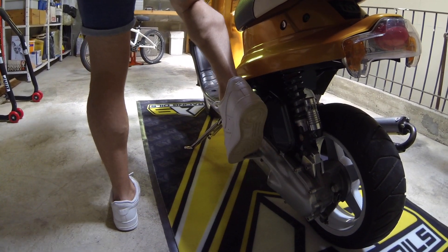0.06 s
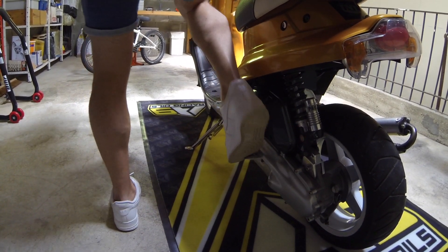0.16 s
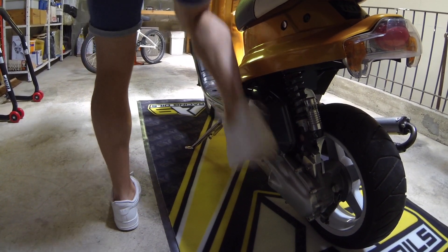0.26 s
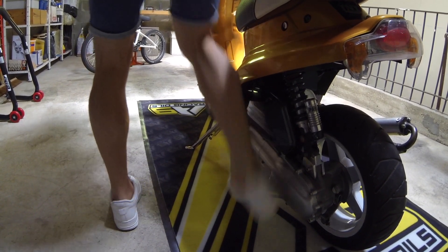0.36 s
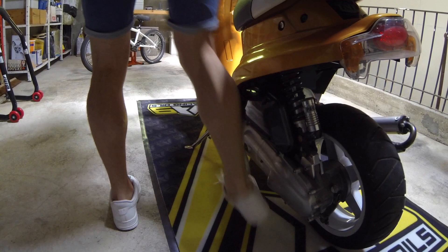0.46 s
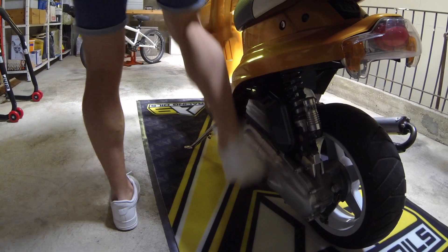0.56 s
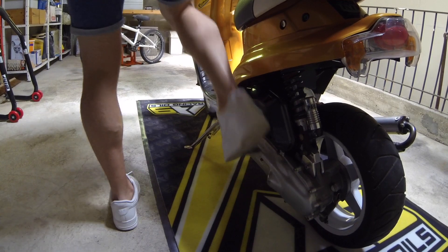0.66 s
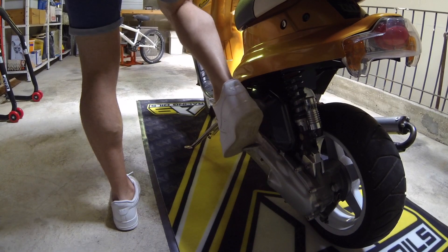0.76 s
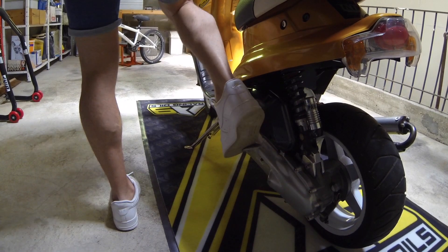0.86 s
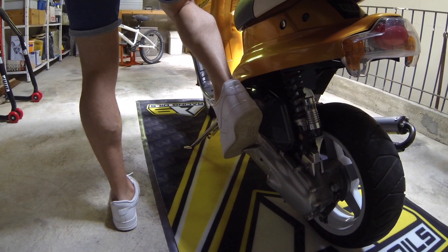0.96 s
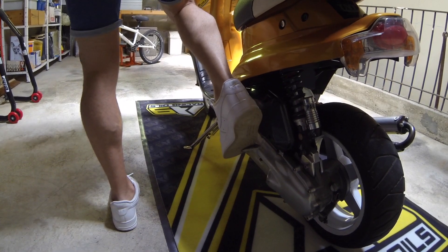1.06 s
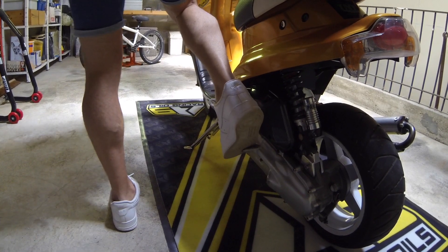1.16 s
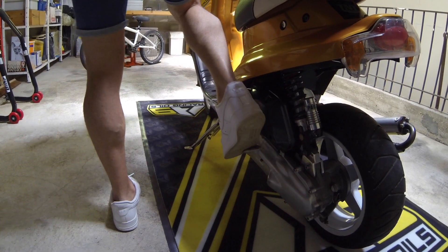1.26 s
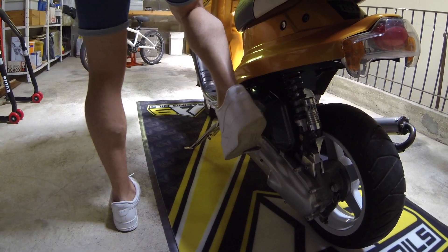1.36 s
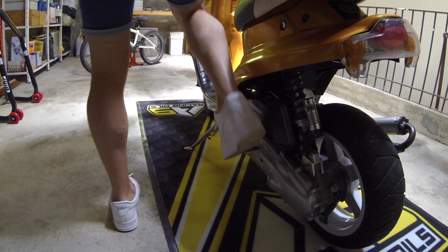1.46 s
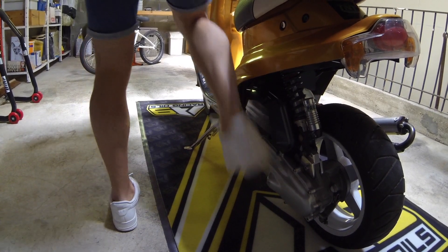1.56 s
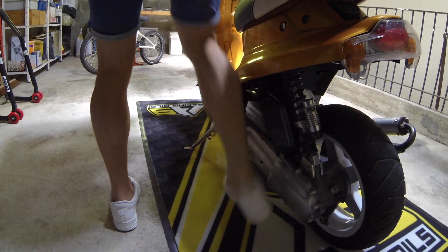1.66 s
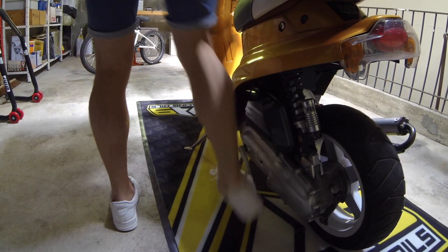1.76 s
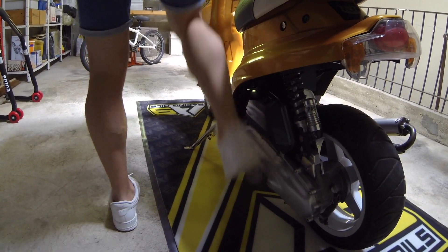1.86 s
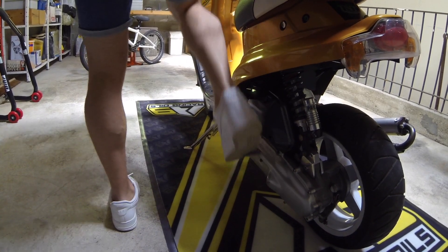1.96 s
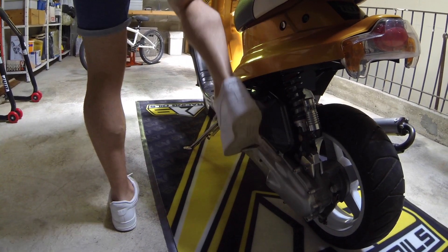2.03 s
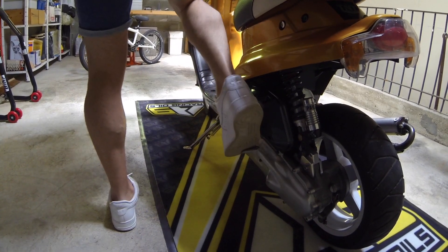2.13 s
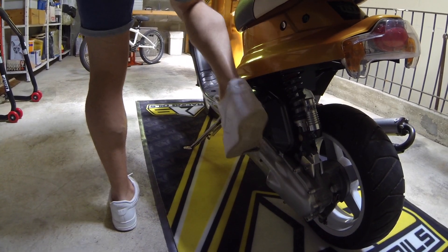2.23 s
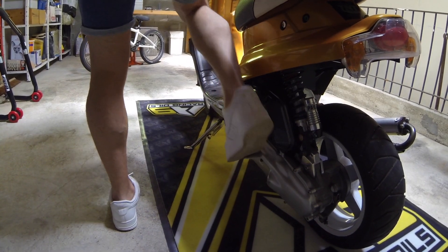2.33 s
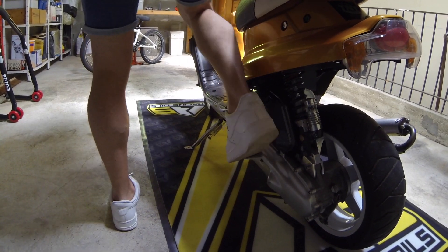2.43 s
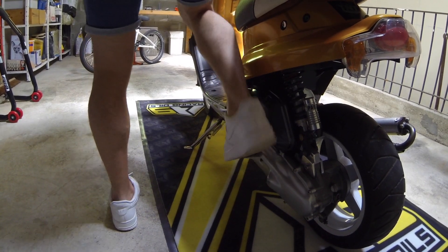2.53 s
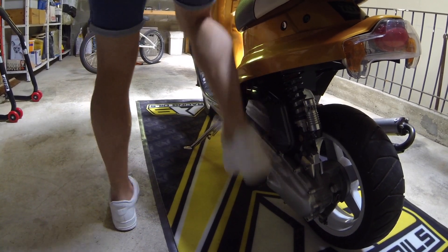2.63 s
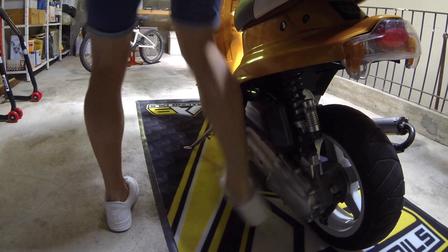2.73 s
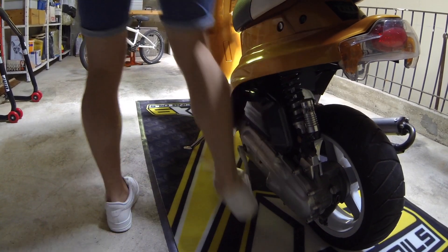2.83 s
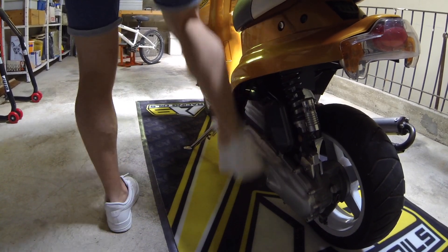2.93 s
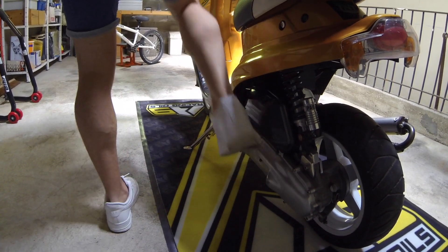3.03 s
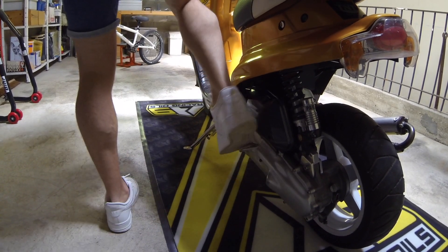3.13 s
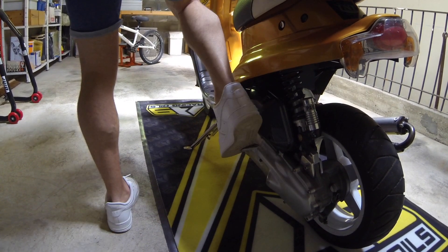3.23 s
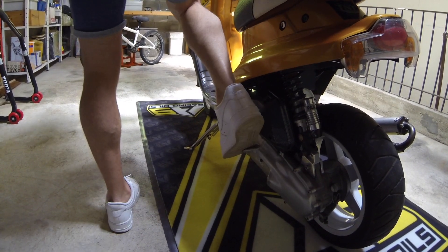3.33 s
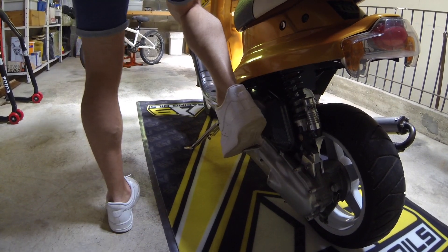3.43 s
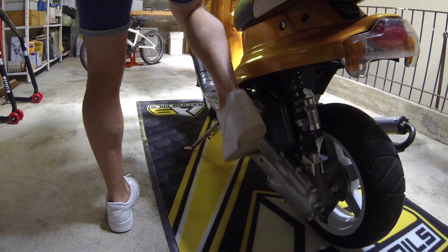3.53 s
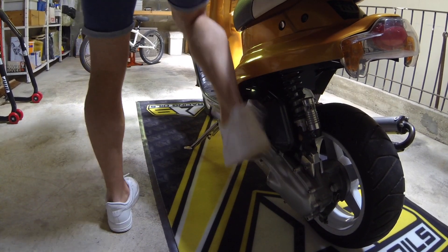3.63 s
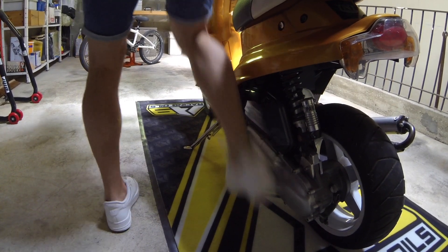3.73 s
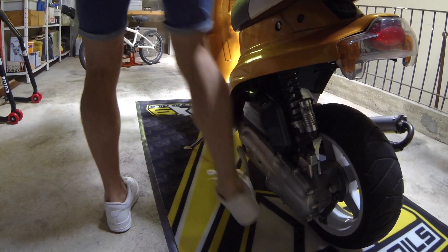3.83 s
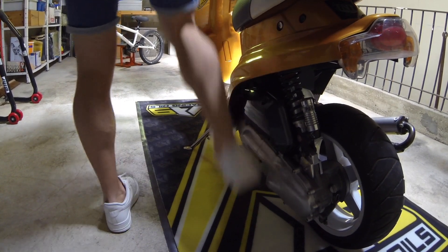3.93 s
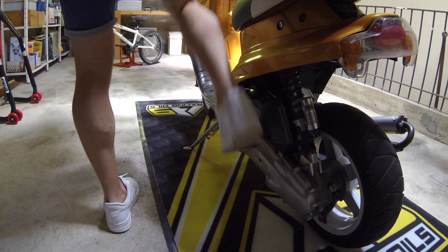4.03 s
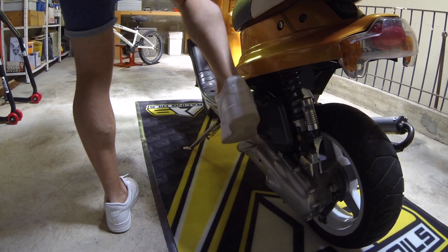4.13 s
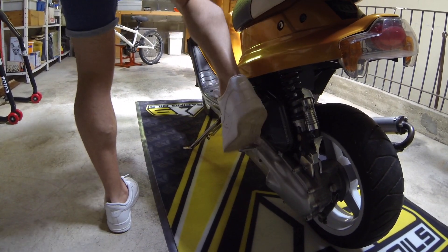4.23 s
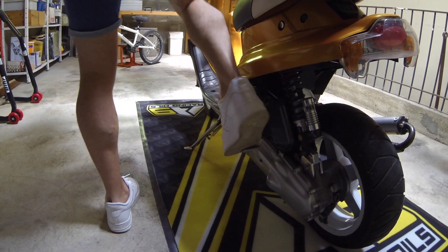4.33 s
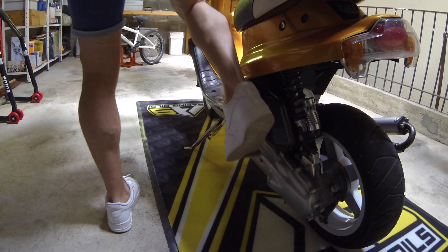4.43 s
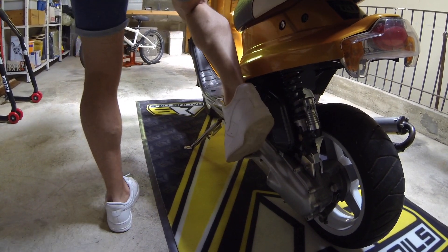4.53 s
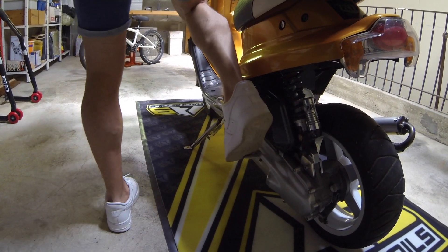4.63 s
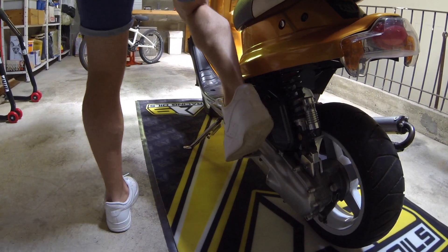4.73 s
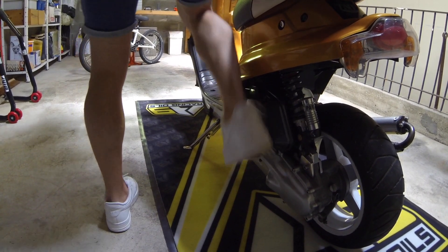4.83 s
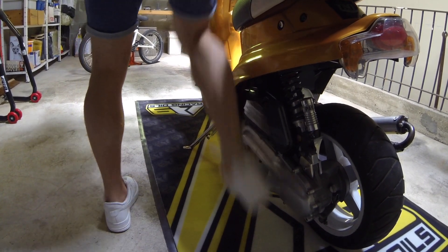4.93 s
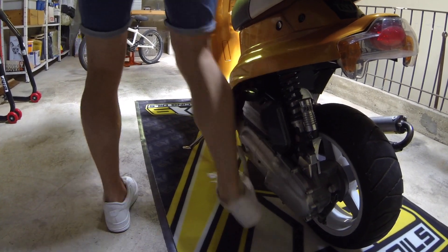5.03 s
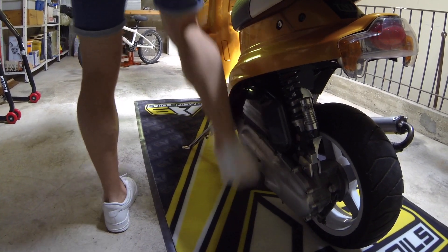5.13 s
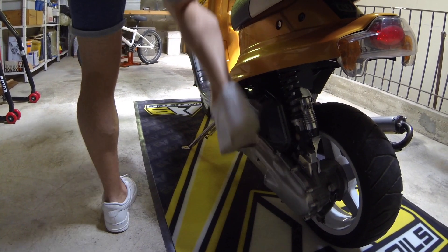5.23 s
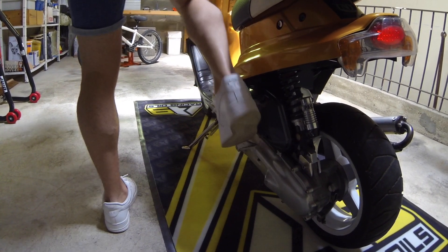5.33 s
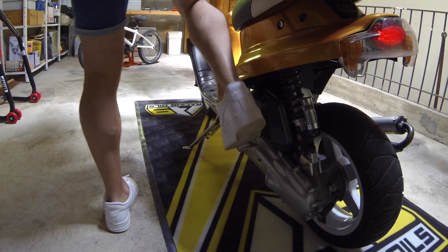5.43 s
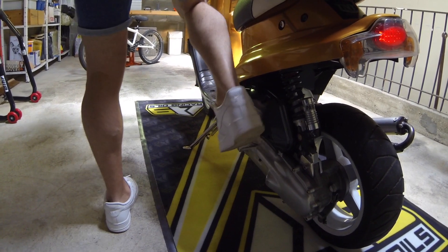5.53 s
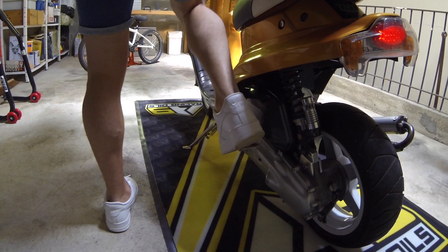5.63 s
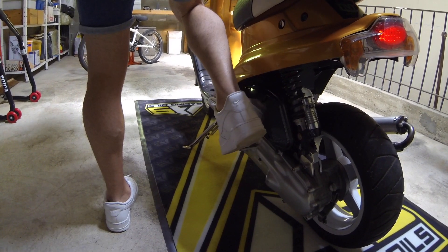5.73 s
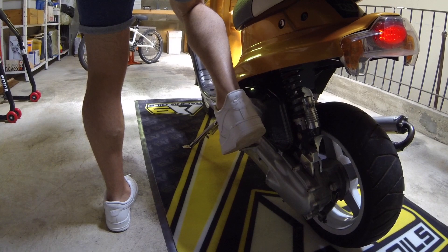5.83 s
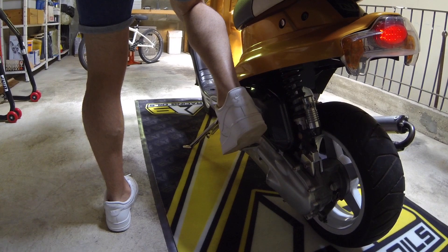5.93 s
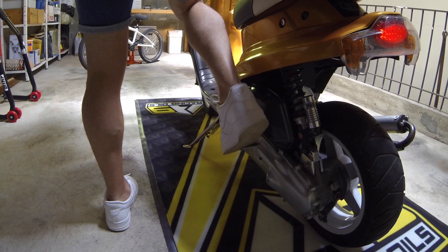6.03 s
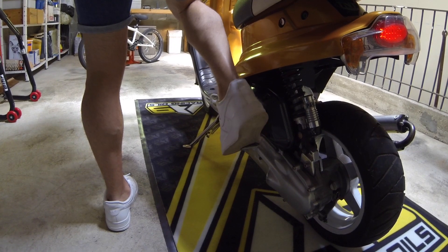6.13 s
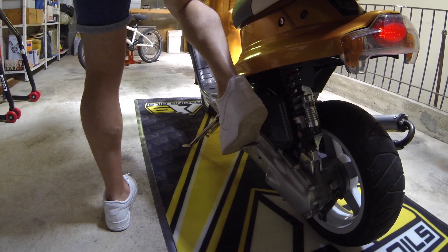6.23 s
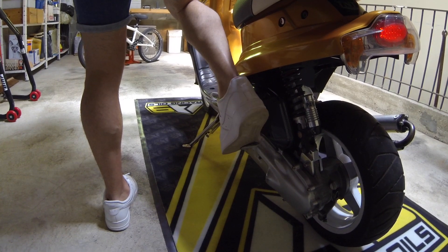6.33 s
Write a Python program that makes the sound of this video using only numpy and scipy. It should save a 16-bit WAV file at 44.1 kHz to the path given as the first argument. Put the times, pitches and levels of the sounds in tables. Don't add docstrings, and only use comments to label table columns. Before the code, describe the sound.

Close by, a scooter's kick lever bites its ratchet, whirs through gears and slams onto a metal stop, five times about a second apart. Between kicks come air puffs, compression chuffs, small knocks and spring-back clunks. After the last, the two-stroke engine catches in a rough rattling burst, then weakens and dies. Short concrete garage reverberation over a faint low hum.

```python
import sys
import numpy as np
from scipy import signal
from scipy.fft import rfft, irfft
from scipy.io import wavfile

SR = 44100
rng = np.random.default_rng(int(sys.argv[2]) if len(sys.argv) > 2 else 0)


def to_wav(sig):
    pcm = np.clip(np.atleast_2d(sig), -1, 1) * 32767
    pcm = np.round(pcm).astype(np.int16)
    wavfile.write(sys.argv[1], SR, pcm.T)


def convert_level_to_amplitude(level_db):
    exponent = np.asarray(level_db, float) / 20
    return 10 ** exponent


N = 281799


def rms_one(x):
    return x / np.sqrt(np.mean(x ** 2) + 1e-20)


def noise():
    return rng.standard_normal(N)


def at_hz(points, hz):
    table_hz, values = np.transpose(points)
    return np.interp(np.log(hz), np.log(table_hz), values)


def coloured(x, spectrum):
    hz = np.arange(N // 2 + 1) * SR / N + 1
    return rms_one(irfft(rfft(x) * convert_level_to_amplitude(at_hz(spectrum, hz)), N))


def steep(x, hz, kind):
    return signal.sosfilt(signal.butter(4, hz, kind, fs=SR, output="sos"), x)


def dip(x, hz, width_hz, depth):
    b, a = signal.iirpeak(hz, hz / width_hz, fs=SR)
    return x - np.clip(depth, 0, 1) * signal.lfilter(b, a, x)


def drift(rate_hz):
    r = np.exp(-2 * np.pi * rate_hz / SR)
    return rms_one(signal.lfilter([1], [1, -2 * r, r * r], noise()))


def grains(per_s, spread_db):
    sizes = convert_level_to_amplitude(spread_db * np.minimum(rng.exponential(1, N), 5))
    signs = rng.choice([-1, 1], N)
    return sizes * signs * (rng.random(N) < per_s / SR)


def fading(x, t60_s):
    return signal.lfilter([1], [1, -convert_level_to_amplitude(-60 / (t60_s * SR))], x)


def impulses(times_s, dbs):
    out = np.zeros(N)
    out[(times_s * SR).astype(int)] = convert_level_to_amplitude(dbs)
    return out


def hump(width_s):
    return np.hanning(round(width_s * SR))


def ring(x, modes):
    out = 0
    for hz, db, t60_s in modes:
        r = convert_level_to_amplitude(-60 / (t60_s * SR))
        w = 2 * np.pi * hz / SR
        out = out + signal.lfilter([0, convert_level_to_amplitude(db) * np.sin(w)], [1, -2 * r * np.cos(w), r * r], x + 1e-18)
    return out


def cycles_to_t60(modes):
    return [(hz, db, cycles / hz) for hz, db, cycles in modes]


def strike(times_s, dbs, modes, rise_s, last_s):
    blow = impulses(times_s, dbs) + 1e-18
    push = blow
    for s in (rise_s, last_s):
        push = signal.lfilter([1], [1, -np.exp(-1 / (s * SR))], push)
    contacts = push / (rise_s * SR) * rms_one(grains(20000, 2.5))
    both = np.array([contacts, blow * np.sqrt(last_s * SR / 2)])
    return ring(both, cycles_to_t60(modes))


# (freq_hz, density_db)
FLOOR = [(12, -26), (20, 1.5), (44, 2), (98, -14), (133, -16), (191, -20.5), (581, -27), (811, -28),
         (985, -29.5), (1720, -32), (2210, -35.5), (13100, -53.5), (15500, -60.5)]


def room_hum():
    return convert_level_to_amplitude(-51) * coloured(noise(), FLOOR) * convert_level_to_amplitude(0.5 * drift(16))


# (freq_hz, t60_s)
GARAGE_T60 = [(100, 0.4), (400, 0.51), (1500, 0.37), (4000, 0.33), (12000, 0.32)]


def garage(x, level_db=-6.5, first_wall_s=0.0044):
    t = np.arange(SR) / SR
    tail = 0
    for hz in 45 * 2. ** np.arange(9):
        sos = signal.butter(2, [hz / 2 ** .5, hz * 2 ** .5], "band", fs=SR, output="sos")
        tail = tail + signal.sosfilt(sos, rng.standard_normal(SR)) * convert_level_to_amplitude(-60 * t / at_hz(GARAGE_T60, hz))
    tail *= np.clip(t / first_wall_s - .5, 0, 1)
    return convert_level_to_amplitude(level_db) * signal.fftconvolve(x, tail / np.sqrt(np.sum(tail ** 2)))[:N]


def phase(kind, start_s, end_s, dbs):
    rise, fall, *layers_db = kind
    t = np.arange(0, N, 32) / SR
    level = 0
    for a, b, db in np.broadcast(start_s, end_s, dbs):
        early, late = np.maximum(a - t, 0), np.maximum(t - b, 0)
        level = level + convert_level_to_amplitude(db - rise * early - fall * late)
    return np.outer(convert_level_to_amplitude(np.array(layers_db)), np.interp(np.arange(N) / SR, t, level))


# (stop_s, peak_db, stroke_s), stroke ends at the stop
KICKS = [
    (0.327, -3.5, 0.079),
    (1.623, -5.5, .072),
    (2.678, -3.5, .0755),
    (3.716, -4.5, 0.078),
    (4.922, -4.5, 0.073),
]
# (rise_db_per_s, fall_db_per_s, air_db, casing_db, mesh_db, cover_db)
LEAN = (160.5, 1998.5, -53.5, -41.5, -53, -73)
DRIVE = (903, 1497, -33, -22.5, -39.5, -73.5)
WHIP = (500.5, 1499, -20, -32.5, -25, -70)
COAST = (3005, 106.5, -27, -24.5, -30.5, -46)
WHEEZE = (2998, 47, -39.5, -71, -68, -81)
SQUEEZE = (251, 282, -37, -39.5, -32.5, -45)
RETURN = (1500, 147.5, -92, -37.5, -36, -56)
SHUFFLE = (200, 189, -50, -54.5, -73, -84)
SING = (298, 300, -68.5, -67.5, -70.5, -34)
# (peak_s, level_db)
SQUEEZES = [
    (0.486, -1.5),
    (1.808, -1.5),
    (2.851, 1),
    (2.952, -9),
    (3.832, 1),
    (3.979, -4.5),
    (5.088, 1.5),
]
RETURNS = [
    (1.891, 6),
    (3.047, -4.5),
    (4.097, 1.5),
]
SHUFFLES = [
    (.942, 3.5),
    (4.3, 3),
    (4.47, -16),
    (4.546, -1),
]
SINGS = [
    (.49, -1.5),
    (1.79, -4),
    (3.865, -5.5),
    (3.965, 0.5),
    (5.18, -2),
]


def motion():
    stop, _, stroke = np.transpose(KICKS)
    bite = stop - stroke + 0.0071
    coast = stop + .02
    out = phase(LEAN, bite - .02, bite - .02, 0)
    out += phase(DRIVE, bite, stop - .015, 0)
    out += phase(WHIP, stop - .005, stop - .005, 0)
    out += phase(COAST, coast, coast, 0)
    out += phase(WHEEZE, stop, stop, 0)
    for kind, rows in ((SQUEEZE, SQUEEZES), (RETURN, RETURNS), (SHUFFLE, SHUFFLES), (SING, SINGS)):
        s, db = np.transpose(rows)
        out += phase(kind, s, s, db)
    return out


# (freq_hz, level_db, t60_s)
CASING = [(230, -27, 0.01), (318, -13.5, 0.17), (465.7, 0, 0.09), (549, -6.5, 0.073), (680, 1.5, 0.031),
          (703, 5.5, 0.027), (1020, -5, 0.039), (1181, -16.5, 0.044)]
# (freq_hz, density_db)
MESH = [(710, -3), (1200, -5), (1290, -22.5), (1420, -11.5), (1800, -1.5), (2050, -5), (3810, -15.5),
        (7570, -34.5), (11900, -38.5), (15500, -55)]
# (freq_hz, density_db)
AIR = [(12, -47), (20, 5), (49, -3.5), (108, 1.5), (136, 7), (183, -36), (239, -1.5), (350, -31.5),
       (460, -52.5), (770, -120)]
# (start_s, peak_db, pitch_hz)
CHUFFS = [(0.47, -22, 92.5), (0.627, -23, 50.5), (0.909, -43, 51.1), (1.788, -41, 98), (2.279, -37, 51.6),
          (2.929, -21, 50.7), (3.471, -36, 115), (3.984, -22.5, 66), (4.166, -30.5, 91.5), (4.451, -34, 79),
          (5.079, -41, 140), (0.654, -27, 140), (3.89, -32, 121), (4.039, -39, 126), (4.251, -37.5, 109)]


def crank():
    air, casing, mesh, cover = motion()
    teeth = rms_one(steep(ring(grains(700, 2.74), CASING), 1700, "low"))
    rasp = coloured(grains(4000, 2.2), MESH) * convert_level_to_amplitude(np.clip(0.28 * drift(29), -6, 6))
    sings = rms_one(steep(ring(grains(1200, 8.0), [(1275, -1.5, 0.19)]), [1000, 1600], "band"))
    puffs = coloured(noise(), AIR) * convert_level_to_amplitude(3.2 * drift(6.5))
    out = convert_level_to_amplitude(-5.0) * (air * puffs + casing * teeth + mesh * rasp + cover * sings)
    t = np.arange(round(.12 * SR)) / SR
    for s, db, hz in CHUFFS:
        swell = convert_level_to_amplitude(db - 1) * t * hz * np.exp(-1.3 * t * hz)
        start = round(s * SR)
        out[start:start + len(t)] += swell * np.sin(2 * np.pi * hz * t)
    return out


# (start_s, peak_db)
HOLLOW_KNOCKS = [
    (1.8686, -23),
    (2.4617, -44.5),
    (3.0415, -26),
    (3.2305, -57),
    (4.0914, -25.5),
    (5.1322, -26.5),
]
DRY_KNOCKS = [(.5244, -29.5), (.6523, -37.5), (.8016, -40), (1.2237, -34.5), (2.0268, -37.5),
              (2.2343, -31.5), (2.9675, -35.5), (3.4175, -25.5), (3.4833, -25.5), (3.9584, -35),
              (4.3166, -25), (4.3879, -38)]
SHARP_KNOCKS = [
    (2.4838, -42),
    (2.8345, -21.5),
    (2.8537, -17.5),
    (3.8989, -34.5),
]
SOFT_KNOCKS = [
    (1.4674, -53),
    (1.496, -51),
    (1.9066, -34.5),
]
# (ring_db, bright_db, shoe_db)
BITE = (6, -26, -2.5)
HOLLOW = (4.5, -28, -19.5)
DRY = (-8.5, -29.5, -9.5)
SHARP = (-13.5, -17.5, -10)
SOFT = (12.5, -30, -20)


def knocks():
    bites = [(stop - stroke, -37.5) for stop, _, stroke in KICKS]
    kinds = ((bites, BITE), (HOLLOW_KNOCKS, HOLLOW), (DRY_KNOCKS, DRY), (SHARP_KNOCKS, SHARP),
             (SOFT_KNOCKS, SOFT))
    return np.transpose([(*row, *colour) for rows, colour in kinds for row in rows])


# (freq_hz, level_db, ring_cycles)
METAL = [(1090, 6, 1.1), (1490, 0.5, 3.2), (1830, -10, 55), (2450, -5.5, 19), (2980, 0, 9.2),
         (3930, -11, 59), (5130, -26.5, 97)]
LEVER = [(556, -10.5, 30), (645, -4.5, 55), (753, -1.5, 53), (781, -0.5, 38), (823, -6, 86),
         (1080, -11.5, 32)]
BRIGHT = [(6600, 4, 11), (8760, -1, 18), (11500, -9, 7.6)]
SHOE = [(201, -3, 0.66), (312, 1.5, 7.2), (430, 3, 18)]
COIL = [(9100, -9, 27), (9800, -4, 29), (11500, -10, 18)]
# (start_s, peak_db)
SPRING = [
    (0.7272, -48),
    (2.0108, -43),
    (3.1263, -47),
    (4.1101, -41),
    (4.1859, -40),
]


def lever():
    s, db, ring_db, bright_db, shoe_db = knocks()
    metal = steep(strike(s, db - 20, METAL, rise_s=0.001, last_s=0.0085), [900, 5600], "band")
    hollow = steep(strike(s, db + ring_db - 27, LEVER, rise_s=0.0007, last_s=0.013), [450, 1200], "band")
    bright = steep(strike(s, db + bright_db - 4, BRIGHT, rise_s=0.0036, last_s=0.0027), [5500, 12500], "band")
    shoe = steep(strike(s, db + shoe_db - 20.0, SHOE, rise_s=0.0027, last_s=0.0039), 1000, "low")
    s, db = np.transpose(SPRING)
    spring = steep(strike(s, db - 15.0, COIL, rise_s=0.00093, last_s=0.0034), 7000, "high")
    return metal + hollow + bright + shoe + spring


# (freq_hz, level_db, ring_cycles)
STOP = [(1272, -11.5, 7.7), (1920, -4.5, 5.1), (2310, -2, 12), (3127, 1.5, 12), (3660, -9, 42),
        (5060, -14.5, 35), (6210, -21, 4), (8330, -20, 9.8), (11500, -33, 12)]
FRAME = [(139, -20, 3.5), (281, -15.5, 30), (428, -11, 20), (736, -3, 10), (770, -6, 31)]


def slam():
    s, db, _ = np.transpose(KICKS)
    crack = steep(strike(s - .001, db - 17.5, STOP, rise_s=0.0018, last_s=0.0046), 13000, "low")
    blow = impulses(s + .001, db - 25)
    jolt = steep(convert_level_to_amplitude(23 - 4.5) * np.convolve(blow, hump(.0004))[:N], 560, "high")
    frame = ring(np.convolve(blow, hump(0.0008))[:N], cycles_to_t60(FRAME))
    return crack - np.roll(jolt, -round(.0009 * SR)) - frame


# (start_s, peak_db)
FIRINGS = [(5.3776, -2), (5.3979, -7), (5.4406, -1.5), (5.5226, -2.5), (5.5849, -0.4), (5.65, 1),
           (5.7172, -2), (5.7852, -5), (5.8085, -7), (5.8781, -9.2), (5.893, -15), (5.9236, -13.5),
           (5.974, -12.5), (5.9991, -10.5), (6.0233, -13), (6.0721, -12)]


def turns():
    k = np.arange(8)
    gaps_s = .02 + .0226 * .71 ** k
    rows = list(zip(5.1444 + np.cumsum(gaps_s) - gaps_s, -13 + 0.66 * k))
    turn_s, miss_db, recharge_db_per_turn = .0225, -21, 5
    for (s, db), (after, _) in zip(FIRINGS, FIRINGS[1:]):
        count = max(round((after - s) / turn_s), 1)
        rows.append((s, db))
        for j in range(1, count):
            rows.append((s + (after - s) * j / count, miss_db + recharge_db_per_turn * (j - 1)))
    rows.append(FIRINGS[-1])
    dying_s = FIRINGS[-1][0] + np.cumsum(0.02 * 1.022 ** np.arange(14))
    return np.transpose(rows + [(s, -25.5) for s in dying_s if s < N / SR])


# (time_s, load_db, unburnt_pumping_db)
RUNNING = [
    (5.1, -42, -21.5),
    (5.196, -17.5, -24.5),
    (5.4, -19, -41),
    (5.484, -22.5, -38),
    (5.804, -24.5, -40),
    (5.958, -29.5, -25.5),
    (6.026, -11, -43),
    (6.13, -34.5, -23),
    (6.39, -41.5, -29),
]
# (full_load_db, load_share, pumping_share)
THROB = (-35, -0.48, 1.01)
RUSH = (-23.5, 0.43, .3)
CLATTER = (-29, 0.34, .01)
INTAKE = (-44, 0.64, .01)


def running():
    t = np.arange(N) / SR
    s, load_db, pumping_db = np.transpose(RUNNING)
    load = np.interp(t, s, load_db) + 22
    pumping = np.interp(t, s, pumping_db) + 30
    on = np.clip((t - s[0]) / .015 + 1, 0, 1)
    return [on * convert_level_to_amplitude(db + a * load + b * pumping) for db, a, b in (THROB, RUSH, CLATTER, INTAKE)]


def throttle():
    t = np.arange(N) / SR
    open_s, shut_s, opening_db_per_s, closing_db_per_s = 5.37, 5.698, 75, 26
    return -opening_db_per_s * np.clip(open_s - t, 0, 1) - closing_db_per_s * np.maximum(t - shut_s, 0)


# (freq_hz, density_db)
RATTLE = [(710, -28.5), (1200, 3), (1350, -13), (1450, 1.5), (2760, -7), (3740, -8.5), (4110, -14.5),
          (5250, -15.5), (7000, -33), (9100, -52), (15400, -120)]


def clatter():
    x = coloured(grains(9000, 2.85), RATTLE)
    reach_hz = 6000 * convert_level_to_amplitude(throttle())
    edges = np.geomspace(1100, 9000, num=10)
    out = 0
    for lo, hi in zip(edges, edges[1:]):
        share = 0.38 + 0.64 / (1 + (np.sqrt(lo * hi) / reach_hz) ** 8)
        out = out + steep(x, [lo, hi], "band") * share
    return out


# (freq_hz, density_db)
HISS = [(3820, -30), (6500, 2), (7250, -2.5), (9980, -2.5), (13900, -18.5), (15500, -26.5)]
# (freq_hz, level_db, t60_s)
AIRBOX = [(38, -16, 0.068), (64.4, -0.5, 0.08), (102, -20, 0.064), (134, -2, 0.1), (248, -6.5, 0.1),
          (291, -11, 0.064)]


def intake(blow, throb_gain, hiss_gain):
    pumped = 0.5 * noise() + 12 * (blow > 0)
    throb = rms_one(steep(ring(pumped, AIRBOX), [46, 340], "band"))
    gasp = 0.42 + 2 * fading(blow ** 2, .2)
    hiss = convert_level_to_amplitude(1.3 * throttle() - 2) * hiss_gain * coloured(grains(12000, 1.7), HISS)
    return gasp * hiss + convert_level_to_amplitude(-9.5) * throb_gain * throb


# (freq_hz, level_db, t60_s)
PIPE = [(135, -8, .06), (243, -6, .07), (365, -4, .08), (465, -9, .05), (584, -5, .07), (655, -10, .04),
        (790, -9, .05), (872, -7, .06), (964, -3, .05), (1087, -6, .05), (1230, -9, .03), (1497, -14, .04),
        (2020, -19, .02)]
# (delay_s, level_db, signed_gain)
PIPE_ECHOES = [
    (.0015, -13, -0.35),
    (0.0139, -3.5, 0.28),
]


def exhaust(blow, gate, rush_gain):
    pulse = np.roll(np.convolve(blow, hump(.0007), "same"), -7)
    pulse = -steep(pulse, 2600, "low")
    echoes = sum(sign * convert_level_to_amplitude(db) * np.roll(pulse, round(lag * SR)) for lag, db, sign in PIPE_ECHOES)
    pops = convert_level_to_amplitude(-4.0) * (pulse + echoes) - convert_level_to_amplitude(-40.5) * ring(pulse, PIPE)
    pops += ring(pulse, [(986, -18, 0.0066)])
    gas = rms_one(steep(ring(grains(5000, 2.5) + 14 * (blow > 0), PIPE), 2400, "low"))
    upper = signal.lfilter(*signal.butter(1, 500, "high", fs=SR), gas)
    gas = gas - (1 - convert_level_to_amplitude(.35 * throttle())) * upper
    return dip(pops + gate * convert_level_to_amplitude(-1.5) * rush_gain * gas, 707, width_hz=37, depth=1.0)


# (freq_hz, level_db, ring_cycles)
FINS = [(2070, -11, 36), (3340, -7.5, 35), (3760, -4.5, 44), (5030, -16.5, 93)]


def engine():
    throb_gain, rush_gain, rattle_gain, hiss_gain = running()
    s, db = turns()
    blow = impulses(s, db)
    gate = 0.5 + 2 * fading(blow, .2)
    snap = 0.5 * fading(blow, 0.064)
    rattle = (gate + snap) * convert_level_to_amplitude(-2.5) * rattle_gain * clatter()
    fins = strike(s, 1.67 * db - 32, FINS, rise_s=0.0024, last_s=0.011)
    whisper = rms_one(steep(noise(), [9400 / 1.18, 9400 * 1.1], "band"))
    belt = convert_level_to_amplitude(-73.5) * (throb_gain > 0) * whisper
    return exhaust(blow, gate, rush_gain) + rattle + fins + belt + intake(blow, throb_gain, hiss_gain)


def scene():
    near, walls = crank() + lever() + slam() + engine()
    return (near + garage(walls) + room_hum())[None]


def band_limit(x):
    return signal.sosfilt(signal.butter(12, 16470, fs=SR, output="sos"), x)


def record(dry):
    top = signal.cheby2(10, 50, 15300 * 1.05, fs=SR, output="sos")
    housed = dip(dry, 7410, width_hz=1500, depth=0.31)
    rounded = 1.248 * np.tanh(housed / 1.346)
    fade_out = np.clip((N - np.arange(N)) / (.004 * SR), 0, 1)
    return band_limit(fade_out * signal.sosfilt(top, rounded))


dry = scene()
out = record(dry)
to_wav(out)
```